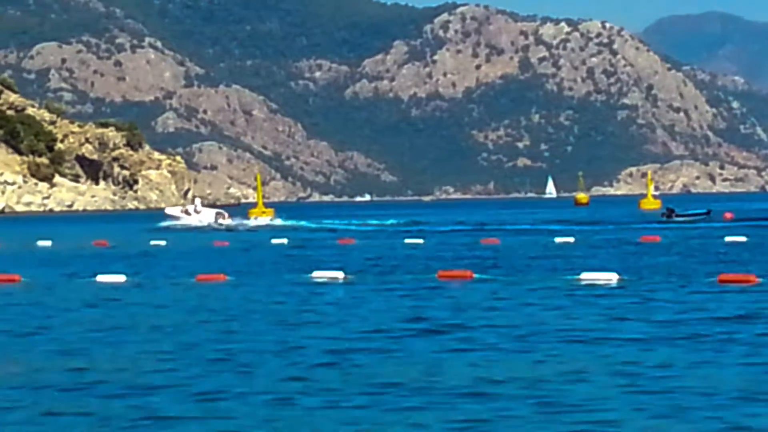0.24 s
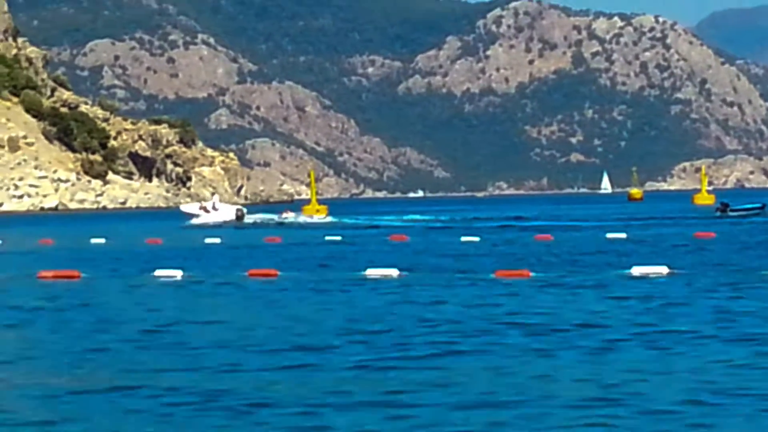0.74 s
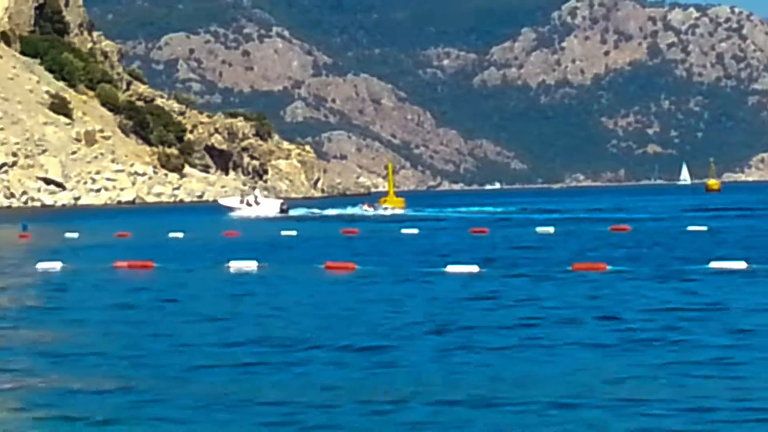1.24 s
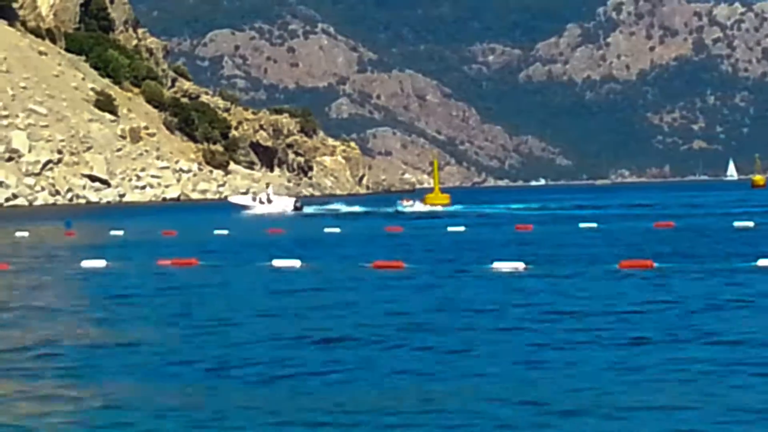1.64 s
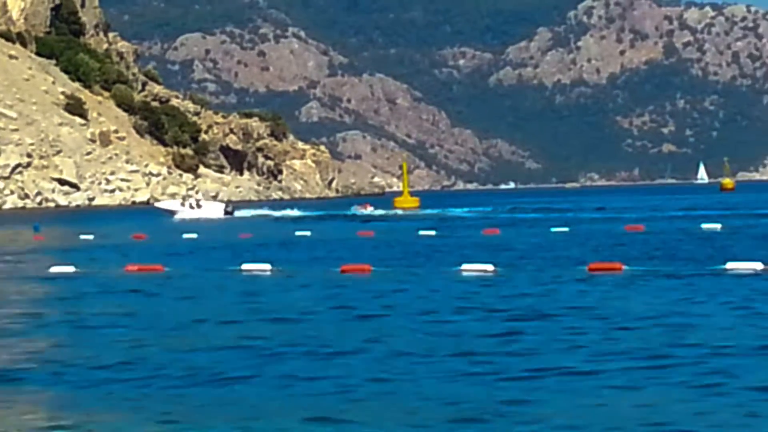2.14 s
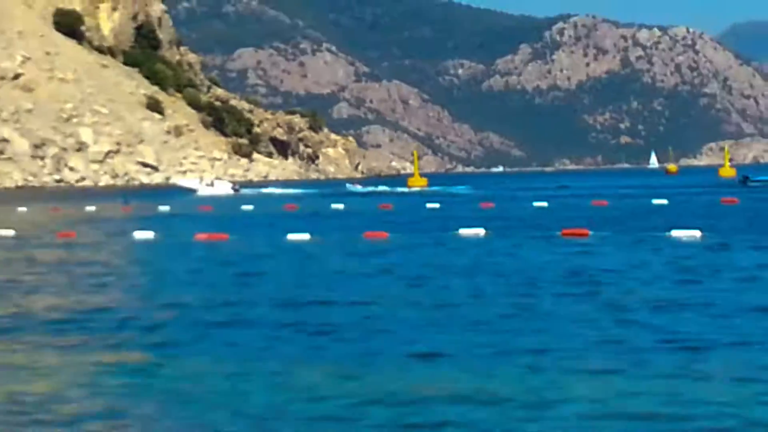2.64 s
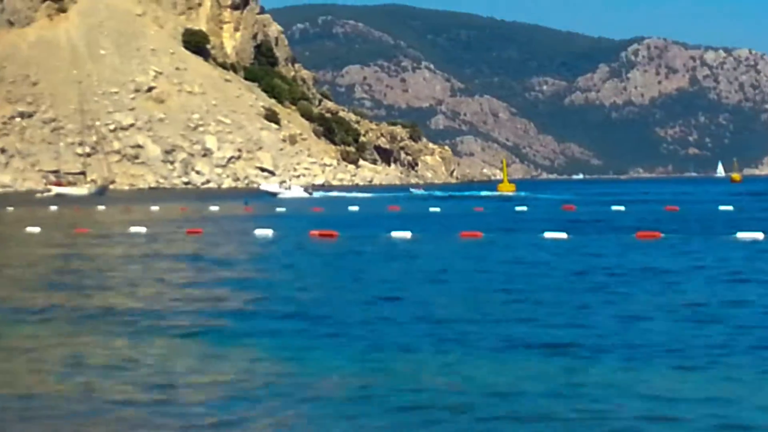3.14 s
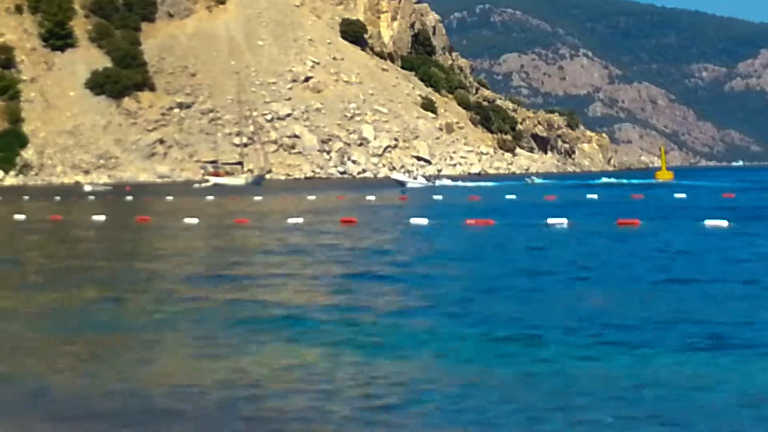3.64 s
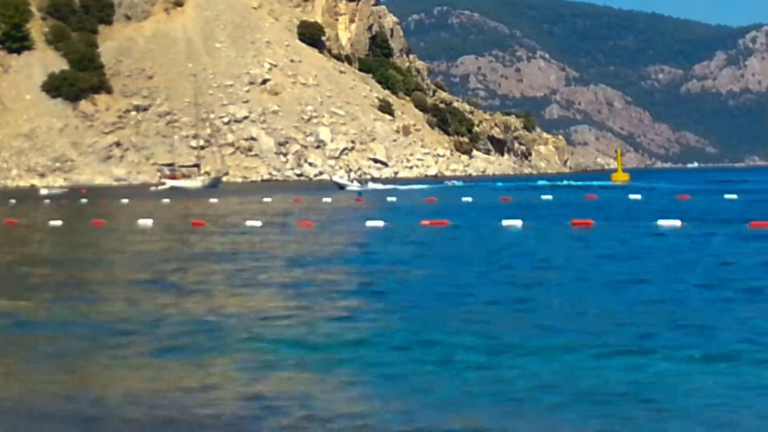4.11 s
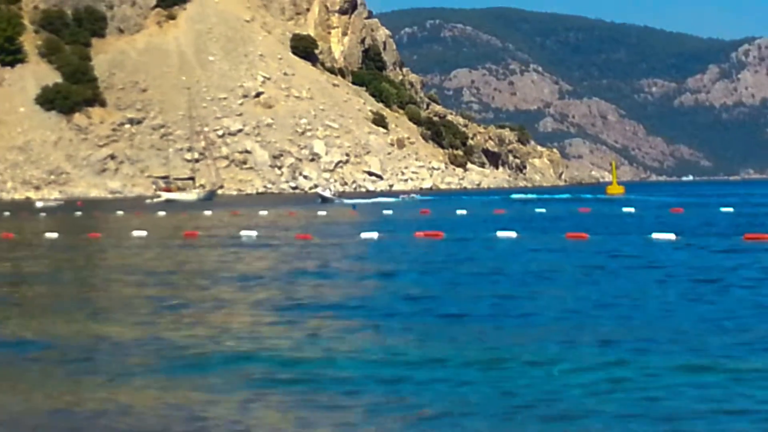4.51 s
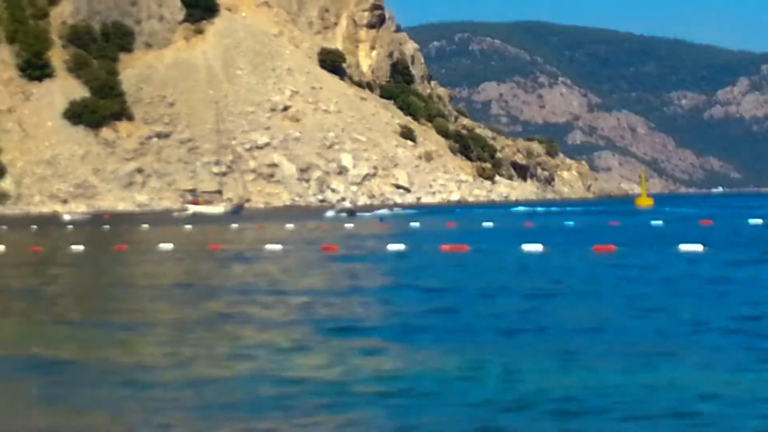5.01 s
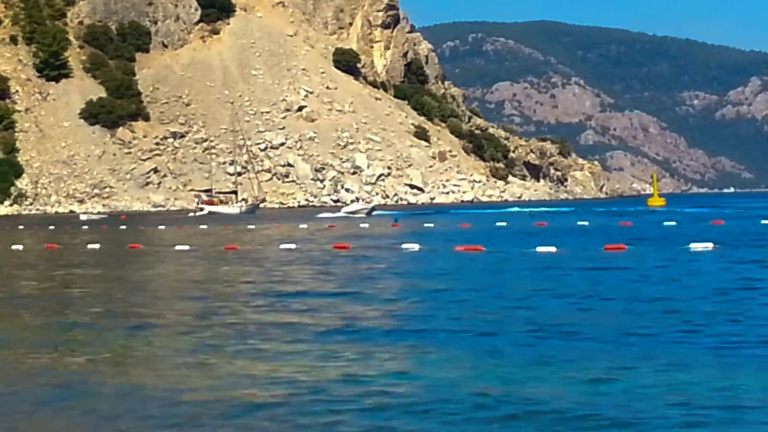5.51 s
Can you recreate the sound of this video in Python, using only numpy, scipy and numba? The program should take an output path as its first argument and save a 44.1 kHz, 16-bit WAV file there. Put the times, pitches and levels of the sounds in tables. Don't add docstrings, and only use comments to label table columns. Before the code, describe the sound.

Close stereo sound of small waves on a pebble shore in a calm open bay. A bubbly slap and wash come first, draining into soft trickling; just after three seconds a sharper splash breaks with bright droplet snaps and gulping bubbles, then foam hisses away. A small lap ends it. The distant boat is not heard.

```python
import sys
import numpy as np
from scipy import signal
from scipy.fft import rfft, irfft, next_fast_len
from scipy.io import wavfile
from scipy.ndimage import uniform_filter1d, map_coordinates
from numba import njit

SR = 44100
rng = np.random.default_rng(int(sys.argv[2]) if len(sys.argv) > 2 else 0)


def transcribe(u):
    v = np.clip(np.atleast_2d(u).T, -1, 1)
    q = np.round(v * 32767).astype(np.int16)
    wavfile.write(sys.argv[1], SR, q)


def volts(x):
    e = np.asarray(x, float) / 20
    return 10 ** e


N = 254000


def read(points, hz, column=1):
    table = np.transpose(points)
    return np.interp(np.log(hz + 1), np.log(table[0] + 1), table[column])


def along(rows, s):
    time, *columns = np.transpose(rows)
    return np.array([np.interp(s, time, c) for c in columns])


def bump(x, middle, width):
    return np.exp(-(np.log(x / middle) / width) ** 2)


@njit
def ring(n, at, turn, size, cycles, glide):
    out = np.zeros(n + 1)
    for b in range(len(at)):
        first = int(np.ceil(at[b]))
        fade = turn[b] / (2 * np.pi * cycles)
        step = np.exp(1j * turn[b] - fade)
        bend = np.exp(1j * glide * turn[b] * fade)
        z = size[b] * np.exp((1j * turn[b] - fade) * (first - at[b]))
        for k in range(max(first, 0), min(first + int(4 / fade), n)):
            out[k] += z.imag
            z *= step
            step *= bend
    return out[:n]


def heard(s, hz, db, lead, pan_db, cycles, glide, order=1):
    turn = 2 * np.pi * np.clip(hz, 60, .45 * SR) / SR
    size = volts(db) * np.sqrt(turn / cycles) / (2 * np.sin(turn / 2)) ** order
    volume = []
    for side in (.5, -.5):
        at = s * SR - side * lead
        volume.append(ring(N + order, at, turn, size * volts(side * pan_db), cycles, glide))
    return np.diff(volume, n=order, axis=1)


# pitch_hz, level_db
SELF_NOISE = [(40, -68), (100, -62), (130, -54), (160, -49), (220, -50), (400, -70), (7000, -62),
              (10000, -53), (13000, -51), (14500, -51), (14900, -66)]


def self_noise(size):
    hz = np.fft.rfftfreq(size, 1 / SR)
    white = rng.standard_normal((2, size))
    return irfft(rfft(white) * volts(read(SELF_NOISE, hz)), size)[:, :N]


# pitch_hz, level_db
COLOUR = [(420, -16), (540, -8), (640, -5), (800, -6), (1000, -7), (1300, -2), (1900, -3.5), (2600, -6),
          (3700, -11.3), (4600, -18), (6000, -23), (7500, -24), (8600, -24.5), (9800, -27.5),
          (10800, -33.5), (12500, -33.5), (14400, -36.5)]
# start_s, peak_db, left_lead_samples, lowest_pitch_hz, highest_pitch_hz
DROPS = [
    (3.032, -14, 8, 4300, 6500),
    (3.2703, -11, 9, 5000, 16000),
    (3.2703, -13, 9, 3500, 7500),
    (3.3165, -13, 8, 4900, 5900),
    (3.3845, -3.5, 9, 4300, 5700),
    (3.4055, -16, 9, 4300, 5800),
    (3.564, -9.5, 8, 2300, 3800),
]


def drops():
    s, db, lead, low_hz, high_hz = np.repeat(DROPS, 8, axis=0).T
    spread_hz = high_hz - low_hz
    hz = low_hz + spread_hz * np.tile(np.linspace(0, 1, 8), len(DROPS))
    late_s = 7 / spread_hz * rng.random(len(s)) / 2
    db = db - .6 * read(COLOUR, hz)
    return heard(s + late_s, hz, db, lead, -4 + 0 * hz, cycles=3.5, glide=0., order=2)


# start_s, near_over_far_left_db, far_right_over_far_left_db,
# near_left_lead_samples (how much sooner the left port hears the breaker)
SHORE = [(0, -6.5, -22.5, 1), (.3, 1.5, -12, 1.5), (.65, 11.5, 2, 3.5), (1.3, 2, 4.5, 5.5),
         (2.5, -2, -7, 7), (3.15, -1, 2, 6), (3.35, 6.5, -8, 9.5), (4.2, -1.5, -6, 6), (5, 1.5, 1, -2),
         (5.3, -2, -3.5, 1), (5.76, 1.5, 9, 11.5)]
# start_s, level_db, pitch_hz, left_minus_right_db
GULPS = [(0.1039, -20, 1380, 3), (0.1194, -20, 2110, 1), (0.2287, -18, 1966, 4), (0.287, -14, 1904, 3.5),
         (0.2986, -27, 3010, -1), (0.3071, -22.5, 3720, 8), (0.3071, -11, 1940, 12),
         (0.326, -26, 3630, 6.5), (0.5763, -26, 733, 0), (0.6148, -27.5, 3660, 19),
         (1.2637, -25.5, 3750, 19), (1.4739, -27, 3400, 10), (1.6764, -23, 3750, 11),
         (1.686, -28.5, 3140, 12), (1.9144, -24.5, 1850, 1), (2.037, -27.5, 687, 6),
         (2.0631, -28.5, 3230, 18.5), (2.1103, -23, 1970, -5), (2.285, -20, 1600, -5.5),
         (2.4633, -22, 1800, -6), (2.5323, -24, 2580, -2.5), (3.023, -27, 1640, 3),
         (3.3148, -27.5, 5430, -5), (3.3156, -21, 2930, 6.5), (3.3177, -17.5, 1880, -1),
         (3.336, -17, 1250, 0), (3.3476, -18.5, 1640, -1.5), (3.358, -15, 1205, 2), (3.3812, -22, 3690, 14),
         (3.384, -33, 5900, -10), (3.3852, -10, 4930, -8), (3.3952, -12, 3200, 12), (3.3961, -16, 820, -6),
         (3.3983, -10, 1830, 2), (3.405, -20.5, 2920, 12.5), (3.406, -14, 4260, -1), (3.5644, -20, 2670, 4),
         (3.5804, -21, 740, -2), (3.6072, -20.5, 1650, 0), (3.6174, -19.5, 2760, 6),
         (3.6959, -22.5, 1240, -4.5), (3.7313, -25, 595, 4), (3.756, -20, 1350, 6), (3.8, -27, 1286, -3.5),
         (3.804, -24, 3100, 13.5), (3.92, -29.5, 3730, 16.5), (4.0375, -25, 727, -2.5),
         (4.0496, -28, 3750, 17.5), (4.1655, -25.0, 2370, -1.5), (5.6492, -27.5, 1940, 1)]


def gulps():
    s, db, hz, pan_db = np.transpose(GULPS)
    db = db + 1 - read(COLOUR, hz) - 10 * np.log10(hz / SR)
    return heard(s, hz, db, along(SHORE, s)[2], pan_db, cycles=8.2, glide=0.014)


# pitch_hz, near_left_minus_right_db, far_left_minus_right_db
SHADE = [(200, -2.5, 7), (350, -4.5, -1), (540, 5.5, -1), (812, -4.5, 1.5), (1630, 0.5, 0), (2600, 4, -3),
         (3230, 1, 6.5), (4390, 12.5, 2), (4400, 2.5, 10.5), (5570, -3, -17), (7570, 3, 1), (8500, -4, 3),
         (10100, -4, 1), (11200, 3, 5.5), (12100, 10, 11), (14100, 7, 7)]
# start_s, peak_db, pitch_hz
SLAPS = [(0.1004, -8, 2000), (.185, -13, 1890), (.228, -8, 1940), (.284, -4, 1900), (1.521, -10, 2000),
         (2.024, -8, 2240), (2.071, -14, 2300), (2.108, -9.5, 2020), (2.384, -18.5, 2000),
         (2.907, -20.5, 2680), (3.118, -13, 1920), (3.167, -9, 1880), (3.271, -9, 2100), (3.3153, -1, 2400),
         (3.336, -1, 1220), (3.36, -4.5, 1195), (3.38, -4, 1410), (3.396, -5.5, 760), (3.411, -4, 2060),
         (3.564, -3, 2500), (3.6166, -4.5, 2740), (3.911, -17, 1980), (4.033, -5.5, 1990),
         (4.1644, -18, 2390), (4.45, -17, 2210), (4.5037, -22, 2580), (4.719, -16, 2000)]
# start_s, peak_db, pitch_hz
SMACKS = [(.2972, -12, 2700), (.3114, -14, 2700), (.3214, -14, 2630), (.3444, -18.5, 3100),
          (3.3159, -12, 2920), (3.3294, -14, 3240), (3.34, -14, 2830), (3.3574, -13.5, 2900),
          (3.3844, -14, 5000), (3.3984, -12, 3010), (3.4074, -12, 3240), (3.5894, -16, 2640),
          (5.6444, -25, 2580)]
SLAP_S, SMACK_S, SLAP_SPREAD = 0.0074, .004, 0.3155


def splashes():
    s, db, hz = np.transpose(SLAPS + SMACKS)[:, :, None]
    length_s = np.repeat([SLAP_S, SMACK_S], [len(SLAPS), len(SMACKS)])[:, None]
    late, tone, angle = np.moveaxis(rng.random((len(s), 30, 3)), 2, 0)
    at = s - length_s * np.log(late + 1e-9)
    pitch = hz * np.exp(SLAP_SPREAD * (4 * tone - 1.5))
    lead = along(SHORE, s)[2] + 8 * (angle - .3)
    db = db - 7.0 - .5 * read(COLOUR, pitch)
    at, pitch, db, lead = at.ravel(), pitch.ravel(), db.ravel(), lead.ravel()
    return heard(at, pitch, db, lead, read(SHADE, pitch), cycles=1.84, glide=0.19)


LAYER_HZ = [170, 600, 1300, 2100, 5000, 10000]
CALM_DB = [-30, -31.5, -37, -38, -41.5, -34]
FOAM_DB = [-9, 1.5, 2, 0, 3, 0]
BACKWASH_DB = [-20, -17, -8, 0, -4.5, -1.5]
FADE_SPEED = [1.7, 1.21, 0.96, 0.94, 1.16, 1.9]
# topple_s, foam_db, foam_fade_db_per_s, backwash_db, backwash_end_s
WAVES = [
    (.31, -25, 4, -30, 2.25),
    (3.32, -26, 6.5, -26.5, 4.57),
    (5.62, -33.5, 11, -43.5, 6.5),
]
BUILD_DB_PER_S, TOPPLE_DB, TOPPLE_S = 17.5, 1.5, 0.022
RUN_UP_S, EBB_DB_PER_S = 0.12, 16.5
# middle_s, peak_db, half_length_s, pitch_hz
CRESTS = [(0, -28, 0.0247, 1600), (0.088, -27, 0.021, 2000), (0.241, -21, 0.068, 15400),
          (0.305, -15.5, 0.021, 5500), (0.322, -24.5, 0.036, 900), (0.61, -32.5, 0.017, 1000),
          (0.77, -30, 0.076, 899), (1.555, -29, 0.021, 2800), (3.015, -34, 0.0157, 5500),
          (3.263, -32, 0.014, 1500), (3.285, -22.5, 0.0113, 9200), (3.329, -16.5, 0.017, 5000),
          (3.36, -19, 0.016, 10000), (3.381, -17, 0.0071, 7000), (3.403, -15, 0.011, 3000),
          (3.445, -27, 0.0144, 1200), (3.468, -22.5, 0.035, 4400), (3.518, -28, .012, 1020),
          (3.568, -21.5, 0.0078, 4500), (3.588, -20.5, 0.028, 5500), (3.632, -23.5, 0.03, 5500),
          (3.58, -27, 0.008, 700), (3.788, -23, 0.088, 2100), (4.034, -27, 0.047, 1080),
          (4.285, -30.5, 0.051, 1800), (5.162, -32.5, 0.2, 18800), (5.45, -37, 0.065, 1200),
          (5.655, -34.5, 0.0205, 2000)]
CREST_OCTAVES, CREST_TAIL = 2.17, 1.71


def surf(s):
    t = np.arange(0, N / SR + .01, .002)
    topple, foam_db, fade, back_db, ends = np.transpose(WAVES)[:, :, None]
    age = t - topple
    rise_db = BUILD_DB_PER_S * age - TOPPLE_DB * np.clip(-age / TOPPLE_S, 0, 1)
    foam = []
    for speed in FADE_SPEED:
        wave_db = foam_db + np.where(age < 0, rise_db, -speed * fade * age)
        foam.append((volts(wave_db) ** 2).sum(0))
    ebb_db = back_db - EBB_DB_PER_S * np.maximum(t - ends, 0)
    back = (np.clip(age / RUN_UP_S, 0, 1) * volts(ebb_db) ** 2).sum(0)
    at, crest_db, half, hz = np.transpose(CRESTS)[:, :, None]
    since = (t - at) / half
    shape = np.exp(-np.where(since > 0, since / CREST_TAIL, since ** 2))
    colour = volts(crest_db) ** 2 * np.exp(-(np.log2(LAYER_HZ / hz) / CREST_OCTAVES) ** 2)
    power = volts(CALM_DB)[:, None] ** 2 + volts(FOAM_DB)[:, None] ** 2 * np.array(foam)
    power = power + np.outer(volts(BACKWASH_DB) ** 2, back)
    surge = power[3]
    fallen = ((age > 0) * volts(foam_db - fade * age) ** 2).sum(0)
    rows = [*10 * np.log10(power + colour.T @ shape), fallen / surge, back / surge]
    return [np.interp(s, t, row) for row in rows]


# middle_s, half_length_s, pitch_hz, level_db
MORE_POCKETS = [(2.35, 0.094, 2140, 2.5), (2.497, 0.054, 2000, 6), (2.78, 0.14, 2050, -2), (3.0, .06, 2400, 4),
                (3.268, 0.056, 1350, 4), (3.338, 0.013, 2300, -5), (3.372, .01, 2100, -6), (3.403, .008, 810, -6),
                (3.436, .02, 2000, -2), (4.05, .08, 1500, 1), (4.28, 0.13, 2300, 1), (4.95, 0.17, 2060, -2.5),
                (5.3, .1, 2250, 0.5), (5.68, .1, 2500, 1), (5.68, .1, 3300, 1), (.62, .15, 2250, -1.5),
                (3.318, .008, 2800, 5), (3.41, .01, 2250, 4), (3.407, .008, 4300, -4), (3.35, .006, 1300, -4),
                (3.33, .015, 5500, 3), (3.6, .04, 4500, 2), (3.4, .1, 13000, 3), (.6, .3, 3700, 1.5),
                (1.8, .2, 1500, -2), (3.5, .1, 560, 2)]
# middle_s, half_length_s, pitch_hz, level_db
POCKETS = [(0, 0.112, 945, 4), (0.197, 0.063, 654, -9), (.3, 0.47, 5990, -2.5), (3.55, 0.28, 13200, 5.5),
           (.35, 0.17, 1660, -1.5), (.3, .3, 366, 5), (.6, 0.345, 1940, 1.5), (.6, .15, 815, -2.5),
           (.35, .1, 1140, 5.5), (.7, 0.6, 1364, 2), (.75, 0.35, 1630, -5), (.8, .35, 2650, 1.5),
           (1.3, 0.112, 2600, 3.5), (1.303, 0.22, 1900, 2), (1.3, 0.18, 565, -3), (1.403, 0.43, 370, -5),
           (2.953, .15, 2700, 1.5), (2, 0.27, 810, -3), (5, 0.36, 2780, -1.5), (2.3, 0.36, 1700, 3),
           (2.35, 0.32, 1040, 2), (3.1, .15, 2200, -3.5), (2.6, 0.32, 350, 4), (2.72, 0.19, 730, 1.5),
           (2.75, 0.22, 1340, -4), (3.053, 0.12, 720, -1.5), (3.198, 0.15, 1850, 4.5),
           (3.35, 0.28, 4850, 1.5), (3.36, 0.029, 1330, 7), (3.41, 0.043, 900, 3), (3.5, 0.27, 480, 4),
           (3.6, 0.051, 990, -6), (3.6, 0.067, 2680, 5), (3.876, 0.097, 350, 8), (4.2, 0.55, 4040, -2),
           (4.15, 0.176, 418, -6), (4.395, 0.11, 640, -5.5), (4.5, 0.18, 1320, -2.5), (4.7, 0.33, 1700, 3),
           (4.5, .3, 2000, -4.5), (4.95, 0.25, 689, -3.5), (5.08, 0.14, 990, -5), (5.25, 0.43, 1310, -4),
           (5.45, 0.153, 1740, 1), (5.68, .12, 1090, 6), (5.5, 0.12, 780, 2), (5.6, 0.19, 3000, 3),
           (5.65, 0.31, 416, 6), (5.65, 0.194, 4260, 1), (5.7, .15, 5840, -2)]
# start_s, pitch_hz, level_db
FAVOURED = [(0, 2300, -0.5), (.3, 1865, 4), (1.2, 2010, -2), (2.2, 2080, 1.5), (2.7, 2000, 1.5),
            (3.2, 4500, 1), (3.38, 5250, 1.5), (3.5, 4500, -0.5), (3.6, 2170, -0.5), (4.7, 2150, 3.5),
            (5.2, 2400, 0), (5.5, 3050, 3), (5.76, 3100, 2.5)]


def clumps(s, hz, own_time):
    db = .4 * patches(own_time, hz, .018, 400) + .6 * patches(own_time, hz, .008, 4000)
    favoured_hz, favoured_db = along(FAVOURED, s)
    db += favoured_db * (bump(hz, favoured_hz, 0.11) - .3)
    for at, half, pocket_hz, pocket_db in POCKETS + MORE_POCKETS:
        now = slice(*np.searchsorted(s, [at - 2 * half, at + 2 * half]))
        db[now] += pocket_db * np.exp(-((s[now] - at) / half) ** 2) * bump(hz[now], pocket_hz, 0.11)
    return db


def patches(s, hz, seconds, width_hz):
    field = rng.standard_normal((1200, 160))
    steps = np.arange(-40, 41)
    in_time = np.exp(-(steps * 0.00516 / seconds) ** 2)
    in_pitch = np.exp(-(steps * 100 / width_hz) ** 2)
    field = signal.fftconvolve(field, np.outer(in_time, in_pitch), "same")
    return map_coordinates(field / field.std(), [s / .005, hz / 100], order=1, mode="nearest")


BUBBLES = 380000
SIZES_HZ, SIZE_SHARES = [60, 450, 2000, 15120], [0, .02, .22, 1]
FAR_LEADS = [17.8, -16.5]
SPREADS = [4., .6, 1.]
# pitch_hz, level_db
NEAR_TINT = [(450, 0.5), (740, 3.5), (1050, -2), (1370, 0.5), (1660, -2), (1980, 1), (2500, -1.5),
             (3700, 0.5), (5300, 2.5), (8000, 0.5)]
# pitch_hz, level_db
RIGHT_DULL = [(700, -9), (1800, 3.5), (5000, -9)]
DRAIN_DB, DRAIN_REST_DB = 7, -1.5
SPRAY_DB, SPRAY_REST_DB = 14, -4


def wash():
    when, pitch, luck = rng.random((BUBBLES, 3)).T
    s = np.sort(when) * N / SR
    hz = np.interp(pitch, SIZE_SHARES, SIZES_HZ)
    crowd = np.diff(SIZE_SHARES) / np.diff(SIZES_HZ) * np.ptp(SIZES_HZ)
    crowd_db = 10 * np.log10(crowd[np.searchsorted(SIZE_SHARES, pitch, "right") - 1])
    stretch = rng.integers(0, 3, BUBBLES)
    *layers, foam, backwash = surf(s)
    tents = [np.interp(np.log(hz), np.log(LAYER_HZ), row) for row in np.eye(len(LAYER_HZ))]
    surf_db = sum(level * tent for level, tent in zip(layers, tents))

    near_db, right_db, near_lead = along(SHORE, s)
    tint_db = read(NEAR_TINT, hz)
    weights = [near_db + tint_db, 0 * s, right_db + read(RIGHT_DULL, hz)]
    share = volts(np.choose(stretch, weights)) / np.sqrt(np.mean(volts(weights) ** 2, axis=0))
    share_db = 0.71 * tint_db + 20 * np.log10(share)
    own_time = (s + 1.9 * stretch) % (N / SR)
    luck_db = 0.8 * np.minimum(-np.log(luck + 1e-9), 7)
    db = 8.04 + surf_db + share_db + clumps(s, hz, own_time) + luck_db - crowd_db

    lead = np.choose(stretch, [near_lead, *FAR_LEADS])
    lead = lead + np.take(SPREADS, stretch) * rng.standard_normal(BUBBLES)
    pan_db = np.where(stretch == 0, read(SHADE, hz), read(SHADE, hz, column=2))
    pan_db += (DRAIN_REST_DB + DRAIN_DB * backwash) * bump(hz, 3900, 0.34)
    pan_db -= (SPRAY_REST_DB + SPRAY_DB * foam) * bump(hz, 5500, 0.099)
    return heard(s, hz, db, lead, pan_db, cycles=2.82, glide=0.0568)


def scene():
    return drops() + gulps() + splashes() + wash()


# pitch_hz, level_db
LOW_CUT = [(20, -17), (80, -36), (130, -34), (170, -21), (200, -10.5), (250, -4), (350, -1.5), (420, -1.5),
           (14400, 0.5), (14800, -10.5)]


def microphone(dry):
    size = next_fast_len(N + 8192)
    hz = np.fft.rfftfreq(size, 1 / SR)
    port_db = np.outer([3, 0], bump(hz + 1, 3746, 0.023))
    case_db = bump(hz + 1, 1940, 0.05)
    colour_db = read(COLOUR, hz) + read(LOW_CUT, hz) + port_db + case_db
    return irfft(rfft(dry, size) * volts(colour_db), size)[:, :N] + self_noise(size)


# pitch_hz, rung_db
RUNGS = [(20, -56), (330, -56), (400, -75), (4200, -60), (4600, -36), (5500, -37.5), (7600, -37.5),
         (8300, -38), (14400, -38), (14750, -32)]
RUNG_FOLLOWS, USUAL_DB, RUNG_WANDER_DB = .75, -25, 2.2
OPEN_S = 3.27


def gate(x):
    hop, front = 1024, 1063
    n, k = np.arange(2 * hop) + .5, np.arange(hop) + .5
    window = np.sin(np.pi * n / (2 * hop))[:, None]
    basis = window * np.cos(np.pi / hop * np.outer(n + hop / 2, k)) * np.sqrt(2 / hop)
    count = N // hop + 3
    blocks = np.pad(x, ((0, 0), (front, (count + 1) * hop - N - front))).reshape(2, -1, hop)
    z = np.concatenate([blocks[:, :-1], blocks[:, 1:]], axis=2) @ basis
    level_db = 10 * np.log10((z ** 2).mean((0, 2)) + 1e-12)[:, None]
    wander = uniform_filter1d(rng.standard_normal((2, count, 32)), 3, axis=1) * np.sqrt(3)
    wander = np.repeat(wander, 32, axis=2)
    rung_db = read(RUNGS, k * SR / 2 / hop) + RUNG_FOLLOWS * (level_db - USUAL_DB)
    rung = volts(rung_db + RUNG_WANDER_DB * wander)
    frame_s = ((np.arange(count) + 1) * hop - front) / SR
    shut = abs(frame_s - OPEN_S)[:, None] > hop / SR
    rounded = np.sign(z) * np.floor(abs(z) / rung + .4) * rung
    frames = np.where(shut, rounded, z) @ basis.T
    out = np.pad(frames[..., :hop], ((0, 0), (0, 1), (0, 0)))
    out = out + np.pad(frames[..., hop:], ((0, 0), (1, 0), (0, 0)))
    return out.reshape(2, -1)[:, front:front + N]


def low_pass(x):
    return signal.sosfilt(signal.butter(12, 15650, fs=SR, output="sos"), x)


def record(dry):
    mix = gate(microphone(dry))
    return low_pass(mix)


dry = scene()
out = record(dry)
transcribe(out)
```